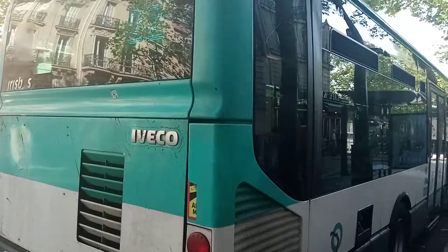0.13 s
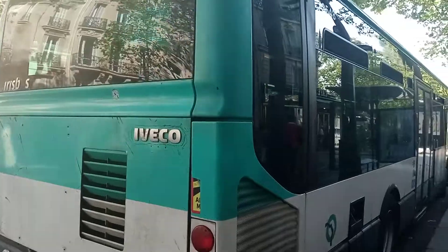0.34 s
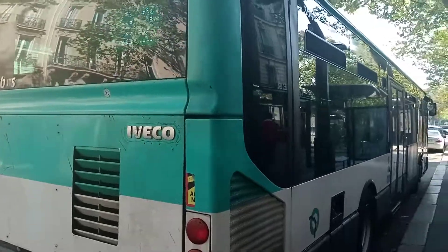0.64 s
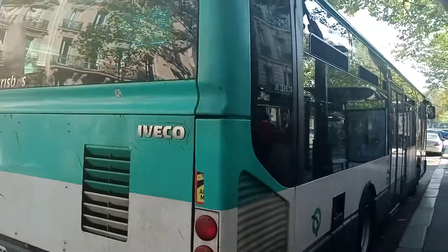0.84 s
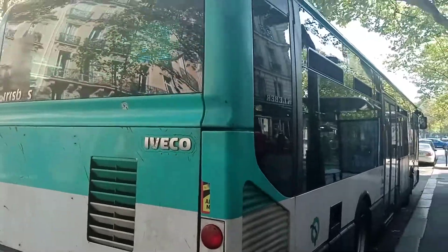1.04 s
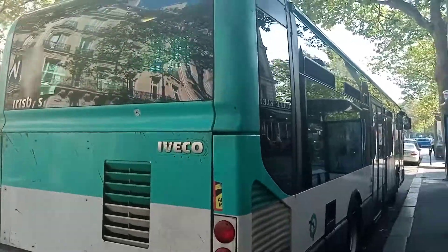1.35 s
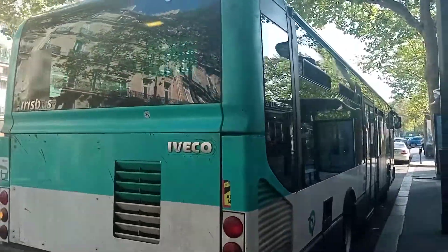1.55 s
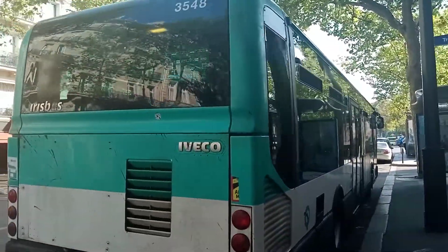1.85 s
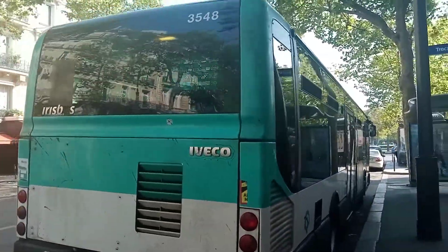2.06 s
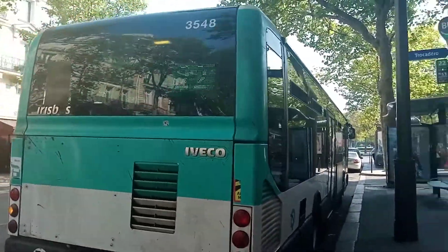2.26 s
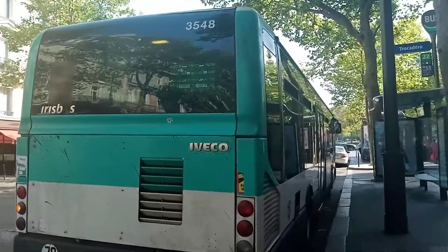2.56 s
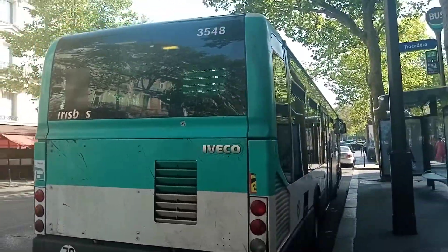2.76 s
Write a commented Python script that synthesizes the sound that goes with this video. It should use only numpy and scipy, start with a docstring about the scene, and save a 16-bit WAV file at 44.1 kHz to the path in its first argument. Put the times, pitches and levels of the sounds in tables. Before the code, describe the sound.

Heard close behind a bus outdoors: near silence, then a throbbing diesel clatter rises quickly, wind bumps the left side during the first second, and the rattling engine and airy grille noise continue evenly to the end.

```python
"""City bus creeping away

A six-cylinder diesel city bus creeps away from a stop at little above idle, heard from beside its rear grille.
Each firing starts a burst of tiny impacts (the knock) and sets loose covers clanking as fading tones.
Filtered noise makes the throbbing exhaust rumble and the rushing air; wavering sine tones make the hums.
The sound swells in and brightens; gusts thump the left microphone and a limiter ducks both sides."""
import sys
import numpy as np
from scipy import signal
from scipy.fft import rfft, irfft, next_fast_len
from scipy.io import wavfile
from scipy.ndimage import uniform_filter1d, minimum_filter1d

SR = 44100
rng = np.random.default_rng(int(sys.argv[2]) if len(sys.argv) > 2 else 0)


def unload_audio(sound):
    """Save the sound as a 16-bit wav file, at the path given as the first command line argument."""
    columns = np.transpose(np.atleast_2d(sound))
    # keep every value between -1 and 1, then stretch to whole-number steps
    steps = np.round(np.clip(columns, -1, 1) * 32767)
    wavfile.write(sys.argv[1], SR, steps.astype(np.int16))


N = 129213  # length in samples


def undb(db):
    """Turn decibels into a plain multiplier."""
    return 10 ** (np.asarray(db) / 20)


def unit(x):
    """Scale to an rms (average strength) of 1."""
    return x / np.sqrt(np.mean(x ** 2))


def curve(table, order=1):
    """Read one column of a time table at every sample, with straight lines between rows."""
    rows = np.array(table)
    return np.interp(np.arange(N) / SR, rows[:, 0], rows[:, order])


def bins():
    """Frequencies in Hz of a spectrum padded beyond the end of the sound."""
    return np.fft.rfftfreq(2 * next_fast_len(N // 2 + 4096), 1 / SR)


def over_hz(table, order=1):
    """Read one column of a frequency table at every bin, evenly along a log pitch scale."""
    rows = np.array(table)
    return np.interp(np.log(bins() + 1), np.log(rows[:, 0]), rows[:, order])


def filt(x, gain):
    """Multiply each frequency by its own gain."""
    return irfft(rfft(x, 2 * len(gain) - 2) * gain)[..., :N]


def colour(x, db):
    """Shape white noise to these levels in dB per Hz, without sounding ahead of time."""
    cepstrum = irfft(np.log(undb(db) * np.sqrt(SR / 2)))
    # Folding the second half onto the first makes the filter respond only after its input.
    half = len(cepstrum) // 2
    cepstrum[1:half] *= 2
    cepstrum[half + 1:] = 0
    return filt(x, np.exp(rfft(cepstrum)))


def split(x, edges_hz):
    """Cut a sound into neighbouring bands that add up to it again."""
    lows = [filt(x, 1 / (1 + (bins() / hz) ** 14)) for hz in edges_hz]
    return np.diff([np.zeros_like(x)] + lows + [x], axis=0)


def walk(rate):
    """Make a smooth random wander of rms 1, with this many new random steps per second."""
    step = int(SR / rate)
    stairs = np.repeat(rng.standard_normal(N // step + 1), step)
    return unit(uniform_filter1d(stairs, step)[:N])


def add(out, start_s, x):
    """Mix a sound in at its start time."""
    i = max(int(start_s * SR), 0)
    if i < N:
        out[..., i:i + x.shape[-1]] += x[..., :N - i]


def firings(cycle):
    """Find the times in seconds at which the cylinders fire: whenever the count passes a whole number."""
    return np.searchsorted(cycle, np.arange(int(cycle[-1]) + 1)) / SR


# Faint ticks on the left: start_s, level_db
TICK_TIMES = [(0.149, -49), (.235, -51), (.565, -46), (.685, -43), (1.021, -26.5), (1.042, -37)]
TICK_DECAY_S = .0007


def ticks():
    """Faint bright ticks on the left: very short bursts of white noise that die away."""
    t = np.arange(SR // 100) / SR
    out = np.zeros((2, N))
    for start, db in TICK_TIMES:
        noise = rng.standard_normal(len(t))
        add(out[0], start, undb(db) * np.exp(-t / TICK_DECAY_S) * noise)
    return out


# Rushing air, before panel ringing, flutter and swell: pitch_hz, level_db_per_hz
AIR_COLOUR = [(100, -57), (600, -62), (1050, -56.5), (1700, -68.5), (2600, -67), (4200, -75.5),
              (5500, -79.5), (7700, -100), (10000, -85.5), (13500, -90), (15000, -84)]
AIR_RING_SHARE = 0.84  # how strongly the air rings the panels
AIR_FLUTTER_DB, AIR_FLUTTER_RATE = 2.08, 25  # spread in dB, random steps per second


def air():
    """Fluttering rush of cooling air through the ringing engine bay and its grille, made of noise."""
    noise = rng.standard_normal((2, N))
    rush = colour(noise, over_hz(AIR_COLOUR) + AIR_RING_SHARE * panels())
    return rush * undb(AIR_FLUTTER_DB * walk(AIR_FLUTTER_RATE))


# Hums of the engine and its belt drives, before waver and swell: multiple_of_firing_rate, level_db_rms
HUM_TONES = [(7.47, -39), (10.05, -39), (13.62, -36), (17, -43.5)]
HUM_WAVER_DB, HUM_DRIFT = 4.5, 0.00418  # spread of level in dB, spread of pitch as a fraction of firing rate


def hums(cycle, rate):
    """Sine tones tied to engine speed, each wavering in level and drifting slightly in pitch."""
    tone = np.zeros(N)
    for multiple, db in HUM_TONES:
        level = undb(db + HUM_WAVER_DB * walk(6.09))
        drift = HUM_DRIFT * np.cumsum(rate * walk(9)) / SR
        tone += level * np.sin(2 * np.pi * multiple * (cycle + drift))
    return np.sqrt(2) * np.array([tone, np.zeros(N)])  # a sine of peak sqrt(2) has rms 1


# Exhaust rumble, before RUMBLE_DB, throb and swell: pitch_hz, level_db_per_hz
RUMBLE_COLOUR = [(45, -67), (80, -49.5), (140, -45.5), (200, -51), (285, -45), (400, -55.5), (500, -54.5),
                 (650, -70), (1200, -88)]
RUMBLE_DB, THROB_DB = -0.5, 1.5  # overall trim, swing up and down


def exhaust(cycle):
    """Low noise rumble that throbs once per firing."""
    throb = undb(THROB_DB * np.cos(2 * np.pi * (cycle - .2)))  # loudest a fifth of a cycle after firing
    noise = unit(throb * rng.standard_normal((2, N)))
    return colour(noise, over_hz(RUMBLE_COLOUR) + RUMBLE_DB)


# Gusts on the left, before the low cut; pitch sags from its start value: start_s, level_db, pitch_hz, decay_s
GUST_THUMPS = [(.378, -7, 99, 0.0085), (.408, -2, 153, 0.012), (.423, -4.5, 114, 0.011),
               (.434, -8.5, 121, 0.0098), (.511, -2.5, 510, 0.0015), (.577, 10, 171, 0.0056),
               (.691, 7, 267, 0.0074), (.988, 12, 247, 0.0076), (1.1, -12, 269, 0.013)]
# Turbulence within a gust, before GUST_ROUGH scales it: pitch_hz, level_db_per_hz
EDDY_COLOUR = [(25, -34), (80, -9), (200, -17), (600, -32.5), (2000, -63), (8000, -121.5)]
GUST_RISE_S, GUST_SAG_S = 0.00078, 0.013  # how fast the level rises and the pitch sags
GUST_LOW_HZ, GUST_CUT_HZ, GUST_ROUGH = 64, 34, 0.31  # pitch it sags towards, low cut, share of turbulence


def gusts():
    """Each gust is a rough thump on the left microphone: a tone of sagging pitch plus turbulence noise."""
    t = np.arange(SR // 10) / SR
    out = np.zeros((2, N))
    eddies = colour(rng.standard_normal(N), over_hz(EDDY_COLOUR))
    for k, (start, db, hz, decay) in enumerate(GUST_THUMPS):
        pitch = GUST_LOW_HZ + (hz - GUST_LOW_HZ) * np.exp(-t / GUST_SAG_S)
        thump = np.sin(2 * np.pi * np.cumsum(pitch) / SR)
        wave = thump + GUST_ROUGH * eddies[k * len(t):(k + 1) * len(t)]
        shape = (1 - np.exp(-(t / GUST_RISE_S) ** 2)) * np.exp(-t / decay)
        add(out[0], start, undb(db) * wave * shape)
    return signal.sosfilt(signal.butter(2, GUST_CUT_HZ, "high", fs=SR, output="sos"), out)


# Ringing engine covers, before scatter, detuning and swell; the lift is for noise passing through:
# pitch_hz, level_db, decay_s, lift_db
COVER_RINGS = [(1013.3, -19, 0.016, 7.5), (1137, -20.5, 0.0077, 2.5), (1312, -24.5, 0.0073, -4.5),
               (2035, -29, 0.007, 3.5), (2388, -22.5, 0.0063, 1), (2762, -39, .012, 6.5),
               (3420, -38, 0.0086, 3.5), (4734, -30.5, 0.0059, 3)]
PANEL_SHARPNESS = 2.27
COVER_SCATTER_DB, COVER_DETUNE = 3, .011  # spread of level in dB, spread of pitch as a fraction
COVER_LATE_S, COVER_RISE_S = .004, .0016  # longest random delay, rise time


def panels():
    """Lift of noise by the cover resonances, in dB at every bin; the longer the ring, the narrower."""
    return sum(lift / (1 + (PANEL_SHARPNESS * decay * (bins() - hz)) ** 2)
               for hz, _, decay, lift in COVER_RINGS)


def covers(cycle):
    """Loose covers clank after each firing as fading tones, each with its own strength and slight detuning."""
    t = np.arange(SR // 14) / SR
    out = np.zeros((2, N))
    for hz, db, decay, _ in COVER_RINGS:
        shape = (1 - np.exp(-t / COVER_RISE_S)) * np.exp(-t / decay)
        for start in firings(cycle):
            size, detune = np.clip(rng.standard_normal(2), -2, 1.5)
            late, turn = rng.random(2)  # delay and starting point within the wave
            pitch = hz * (1 + COVER_DETUNE * detune)
            ring = shape * np.sin(2 * np.pi * (pitch * t + turn))
            add(out[0], start + COVER_LATE_S * late, undb(db + COVER_SCATTER_DB * size) * ring)
    return out


EVEN_WIDTH_HZ = 320  # a stroke feeds every band this wide about equally


def even(burst):
    """Give a burst about equal energy across broad bands."""
    spectrum = rfft(burst)
    width = max(int(EVEN_WIDTH_HZ * burst.shape[-1] / SR), 2)
    return irfft(spectrum / np.sqrt(uniform_filter1d(abs(spectrum) ** 2, width)))


# Relative knock of each cylinder, in firing order: low_clang_db, mids_db, treble_db
CYLINDER_LEVELS = [(-1, 1, -1.5), (-4, 2.3, 2.5), (-1.6, -1.5, 1.5), (-0.2, 1, 3), (-3.7, 2.5, 0.6),
                   (1.3, -1, 0.9)]
# Edges between those three bands: pitch_hz
CYLINDER_EDGES = [1360, 3200]
# How a knock builds and dies, one row for each of the three bands: rise_s, decay_s
KNOCK_ENVELOPES = [(0.0079, 0.012), (0.0016, 0.012), (0.001, 0.02)]
# Knock colour, before panel ringing, wander and swell: pitch_hz, level_db_per_hz
KNOCK_COLOUR = [(200, -87), (500, -78.5), (700, -69.5), (860, -55.5), (1050, -57.5), (1280, -57.5),
                (1700, -68.5), (2400, -65.5), (3050, -73.5), (3600, -71), (4400, -80.5), (5400, -86.5),
                (6600, -81), (7700, -101), (9500, -89.5), (13500, -85), (15000, -79.5)]
JITTER_S, KNOCK_SCATTER_DB = .0005, 1  # random spread of timing and level
REPEAT_SHARE = 0.58  # share of the power that repeats: half common to all cylinders, half each one's own
GRAIN_DB = 5  # spread of the tiny impacts within a knock


def grains(length):
    """Tiny impacts: noise whose strength jumps at random from sample to sample."""
    return rng.standard_normal((2, length)) * undb(GRAIN_DB * rng.standard_normal(length))


def knocks(cycle):
    """Each firing sets off a burst of tiny impacts in the block; each cylinder has its own pattern and colour."""
    t = np.arange(SR // 10) / SR
    shapes = np.array([(1 - np.exp(-t / rise)) * np.exp(-t / decay) for rise, decay in KNOCK_ENVELOPES])
    shapes /= np.sqrt(np.mean(shapes ** 2, axis=1, keepdims=True))
    common = grains(len(t))
    own = [grains(len(t)) for _ in CYLINDER_LEVELS]
    out = np.zeros((len(shapes), 2, N))
    for k, start in enumerate(firings(cycle)):
        cylinder = k % len(CYLINDER_LEVELS)
        late, size = rng.standard_normal(2)
        repeated = np.sqrt(REPEAT_SHARE / 2) * (common + own[cylinder])
        burst = repeated + np.sqrt(1 - REPEAT_SHARE) * grains(len(t))
        for band, shape, db in zip(out, shapes, CYLINDER_LEVELS[cylinder]):
            knock = even(burst * shape) * undb(db + KNOCK_SCATTER_DB * size)
            add(band, start + JITTER_S * late, knock)
    # Keep from each track only the band its envelope is meant for.
    clatter = sum(split(unit(band), CYLINDER_EDGES)[k] for k, band in enumerate(out))
    return colour(clatter, over_hz(KNOCK_COLOUR) + panels())


# Edges of the knock bands that wander in level: pitch_hz
RING_EDGES = [1096, 1826, 2850, 4010]
RING_WANDER_DB = 2.4


def rattle(x):
    """Different panels ring out from moment to moment, so the level of each band wanders on its own."""
    return sum(band * undb(RING_WANDER_DB * walk(39.27)) for band in split(x, RING_EDGES))


# The right microphone faces away from the engine: pitch_hz, level_against_left_db, likeness_0_to_1
RIGHT_SIDE = [(60, -6.5, 0.6), (119, -5, 0.51), (335, 0, 1), (690, -0.5, 0.05), (960, -8.5, 0.85),
              (1265, 0.5, 0.5), (2490, -4.5, 0.34), (3300, -10, 0.16), (4540, -23.5, 0), (5800, -43, .1),
              (9600, -17.5, 0.9), (12500, -45.5, .1), (15000, -49, .1)]
RIGHT_LAG_S = 0.00019


def microphones(pair):
    """The left hears the bus directly; the right later, duller and mixed with street reflections (own noise)."""
    direct, diffuse = pair
    like = np.clip(over_hz(RIGHT_SIDE, order=2), 0, 1)
    shade = undb(over_hz(RIGHT_SIDE)) * np.exp(-2j * np.pi * bins() * RIGHT_LAG_S)
    right = filt(direct, shade * like) + filt(diffuse, shade * np.sqrt(1 - like ** 2))
    return np.array([direct, right])


# Swell of both sides: time_s, level_db, extra_db_above_MIDS_HZ
SWELL_LEVELS = [(.095, -101, -5), (.12, -17, -7.5), (.22, -3.5, -8), (.34, 2, -7), (.45, 1.5, -5.5),
                (.8, 1, -1.5), (1.25, 0, -0.5), (1.55, 1.5, -0.5), (2.2, 1, 0), (2.93, 1.5, -0.5)]
# The left starts muffled and opens: time_s, level_db, extra_low_treble_db, extra_high_treble_db
LEFT_OPENING = [(.15, -4.5, -20, -27.5), (.33, -6, -28, -20), (.45, -2.5, -5.5, -17), (.7, 3, -6, -18.5),
                (.8, 1, 2.5, -14.5), (1.01, 1.5, -2.5, -16.5), (1.025, 1.5, -3, -9.5), (1.13, 0, 1.5, -8),
                (1.24, 2, -2.5, -2), (1.55, 0, 0.5, -6), (2.93, -0.5, 1, -4.5)]
# Extra level of the highest hiss, on both sides: time_s, level_db
HISS_LEVELS = [(.85, -5.5), (1.2, 2)]
MIDS_HZ, LOW_TREBLE_HZ, TREBLE_HZ, TOP_HISS_HZ = 1690, 3080, 4470, 13400  # lower edge of each band


def left_gain(order):
    """Gain over time from one column of the opening, on the left only."""
    return undb(np.array([curve(LEFT_OPENING, order=order), np.zeros(N)]))


def swell(x):
    """The level rises, lows first; the treble opens on the left."""
    low, mids, low_treble, treble, hiss = split(x, (MIDS_HZ, LOW_TREBLE_HZ, TREBLE_HZ, TOP_HISS_HZ))
    high_treble = treble + hiss * undb(curve(HISS_LEVELS))
    top = mids + low_treble * left_gain(2) + high_treble * left_gain(3)
    brightened = low + top * undb(curve(SWELL_LEVELS, order=2))
    return undb(curve(SWELL_LEVELS)) * left_gain(1) * brightened


# Engine speed: time_s, firings_per_second
ENGINE_SPEED = [(0, 26.75), (1, 27.47), (1.8, 27.75), (2.93, 27.72)]
FIRST_FIRING_S = .026


def scene():
    """The bus at the two microphones, with the gusts and ticks."""
    rate = curve(ENGINE_SPEED)
    cycle = np.cumsum(rate) / SR - FIRST_FIRING_S * rate[0]  # running count of firings
    bus = air() + hums(cycle, rate) + exhaust(cycle) + covers(cycle) + rattle(knocks(cycle))
    return ticks() + gusts() + swell(microphones(bus))


LOW_CUT_HZ, TOP_HZ = 56, 15850
LIMIT_DB, LIMIT_RELEASE_S, LOOKAHEAD_S = -1.7, 0.018, .005


def record(dry):
    """A low cut, a look-ahead limiter shared by both sides, then a steep low-pass."""
    dry = signal.sosfilt(signal.butter(2, LOW_CUT_HZ, "high", fs=SR, output="sos"), dry)
    # Excess over the limit (natural log), kept just above 0 so that its own log exists.
    peak = abs(dry).max(axis=0)
    over = np.maximum(np.log(peak / undb(LIMIT_DB) + 1e-12), 1e-12)
    # Each excess is held and fades exponentially until a larger one takes over.
    fall = np.arange(N) / SR / LIMIT_RELEASE_S
    held = np.exp(np.maximum.accumulate(np.log(over) + fall) - fall)
    # Turn down ahead of each peak, then smooth the gain.
    ahead = int(LOOKAHEAD_S * SR) + 1
    lowest = minimum_filter1d(np.exp(-held), 2 * ahead)
    gain = uniform_filter1d(lowest, 2 * ahead)
    return signal.sosfilt(signal.ellip(10, .2, 70, TOP_HZ, fs=SR, output="sos"), dry * gain)


dry = scene()
out = record(dry)
unload_audio(out)
```